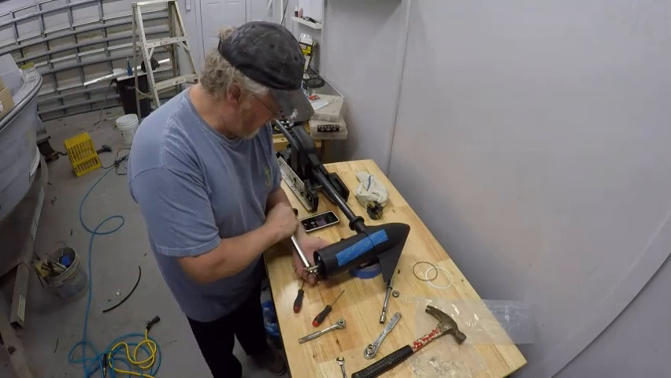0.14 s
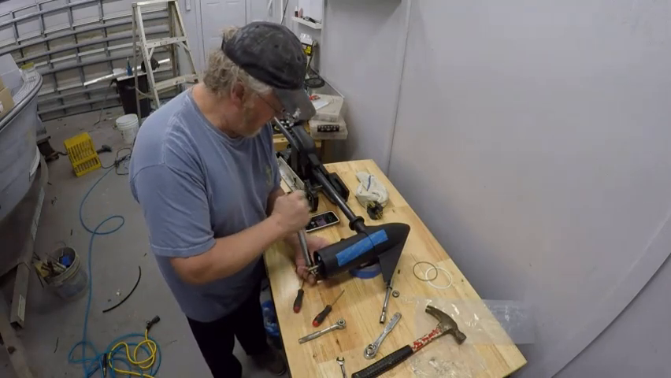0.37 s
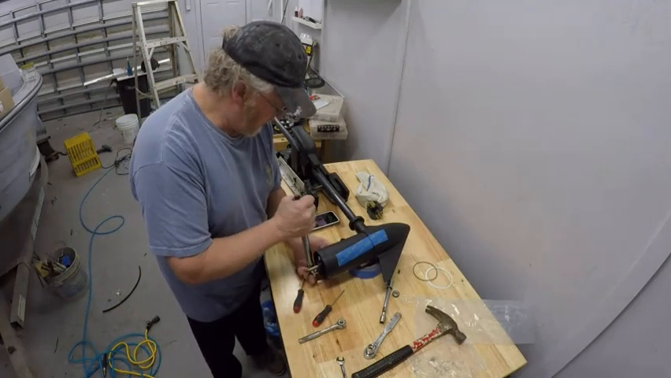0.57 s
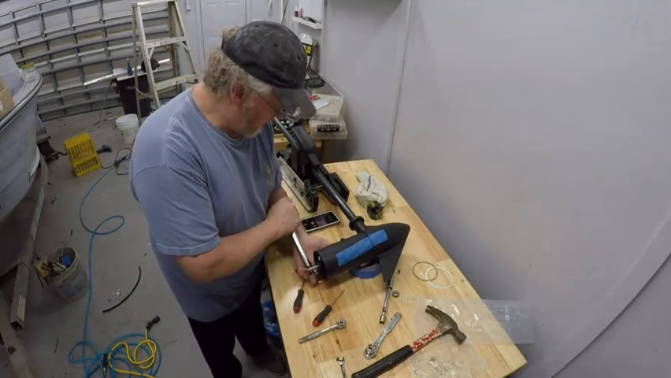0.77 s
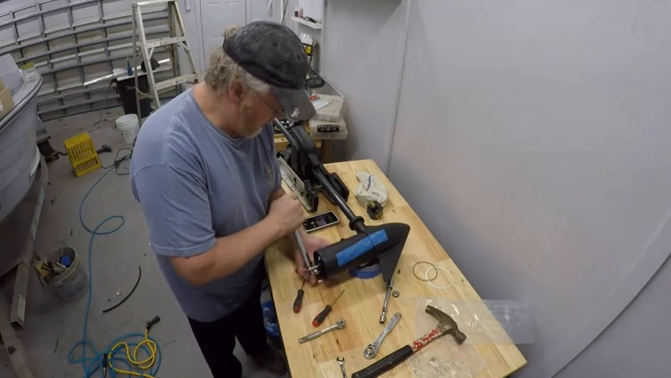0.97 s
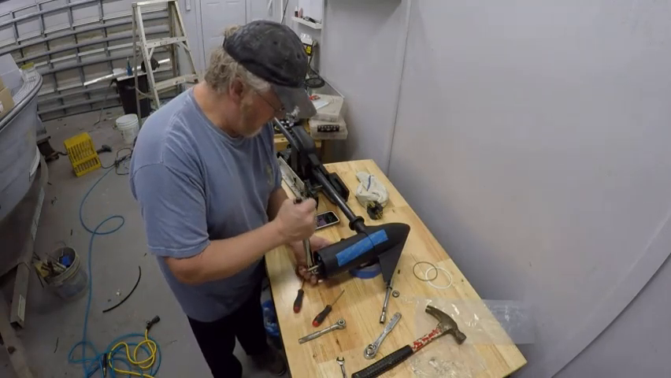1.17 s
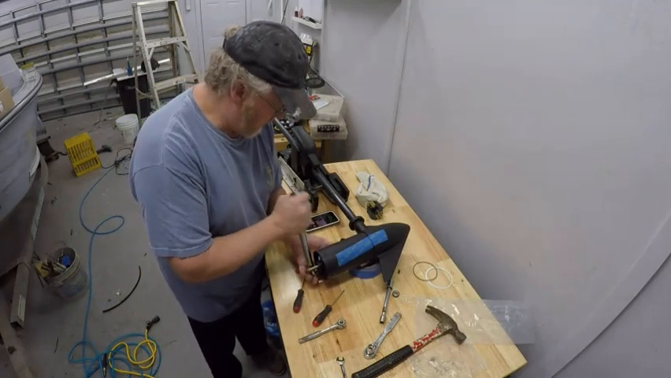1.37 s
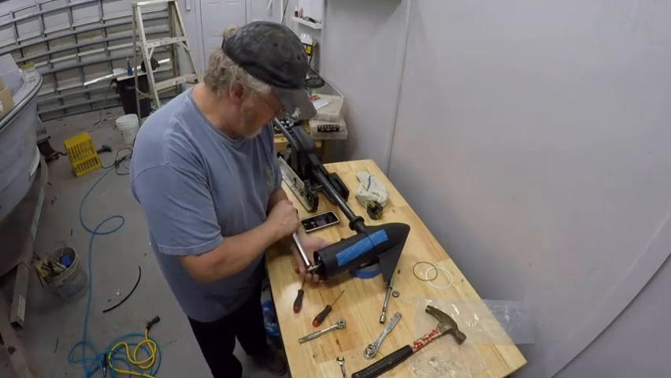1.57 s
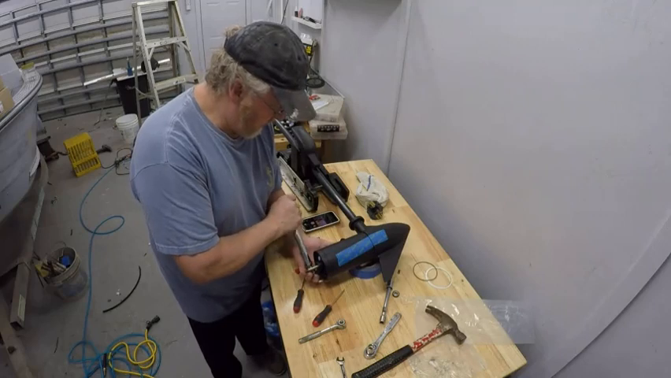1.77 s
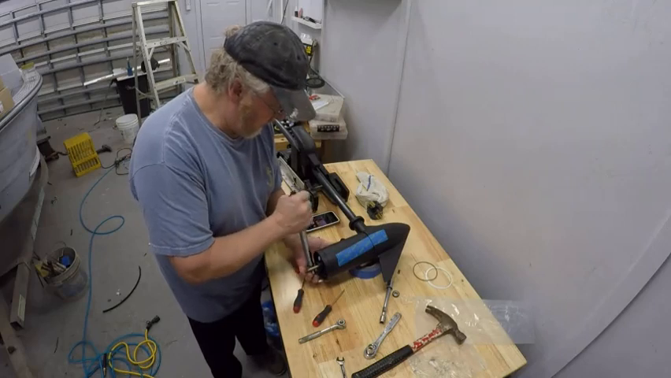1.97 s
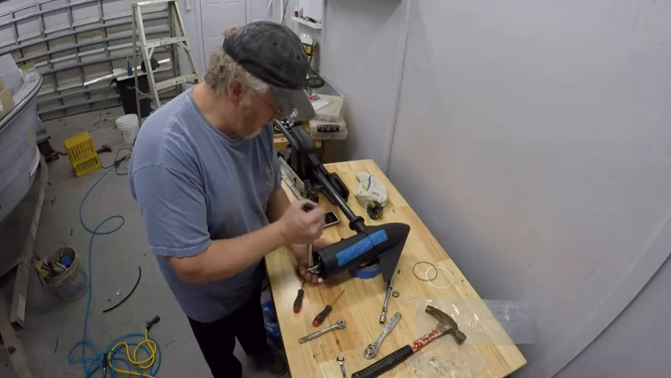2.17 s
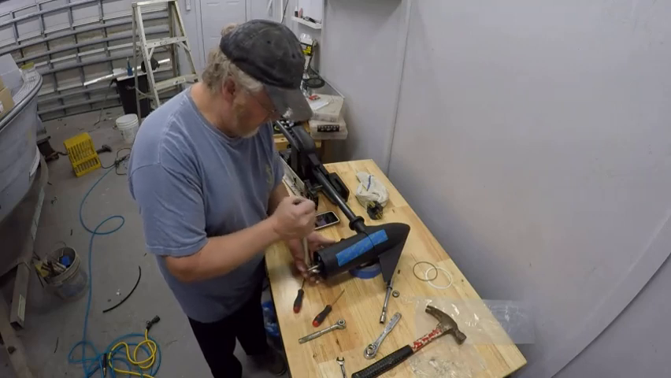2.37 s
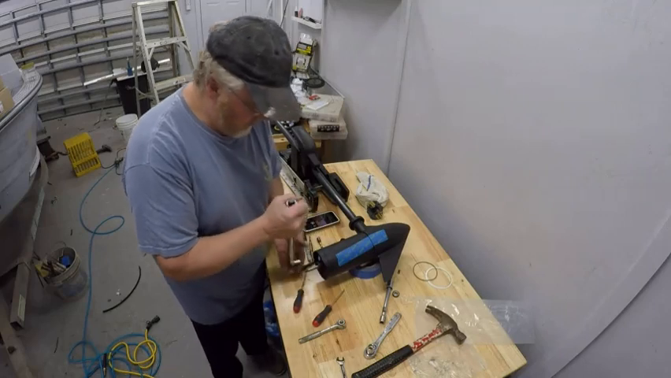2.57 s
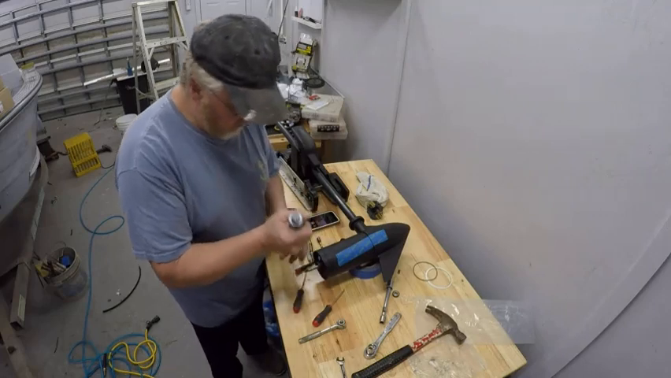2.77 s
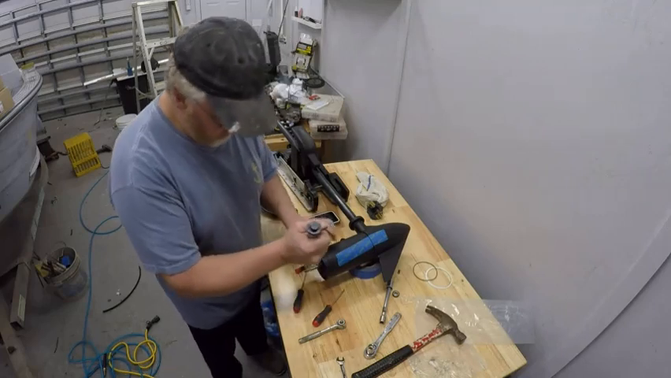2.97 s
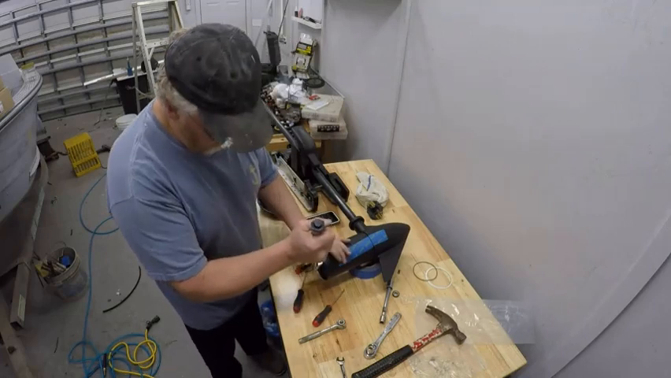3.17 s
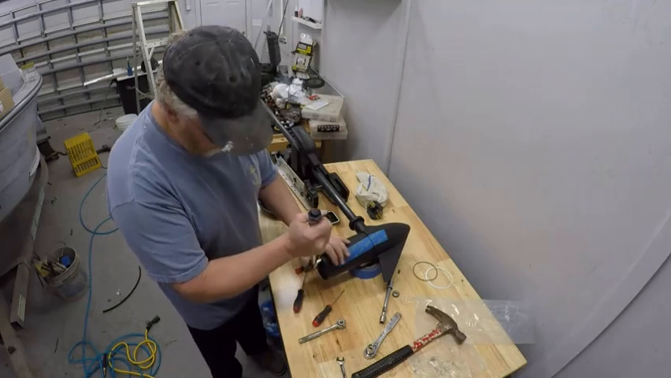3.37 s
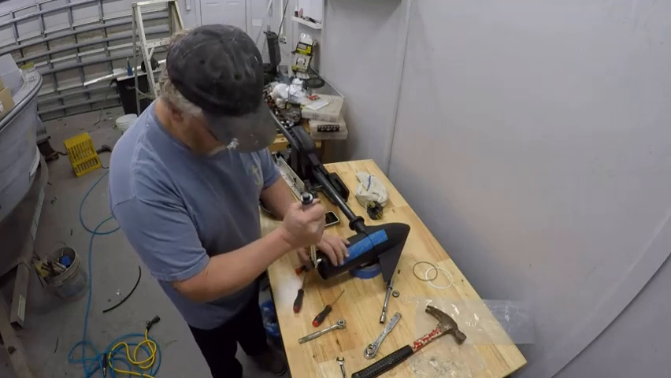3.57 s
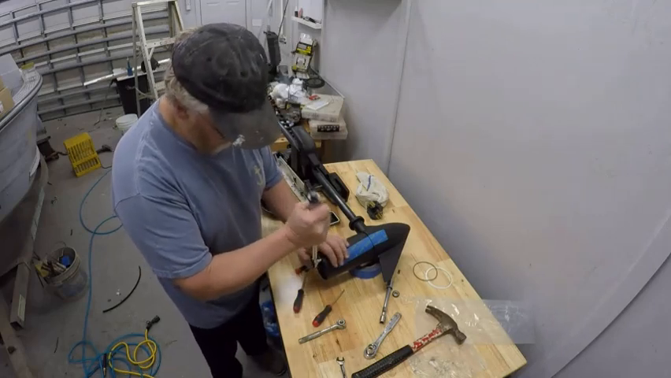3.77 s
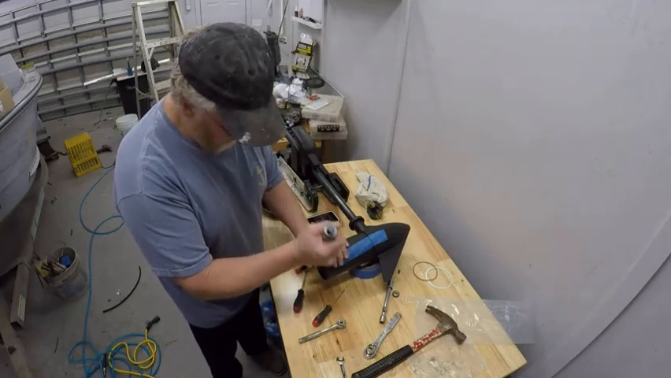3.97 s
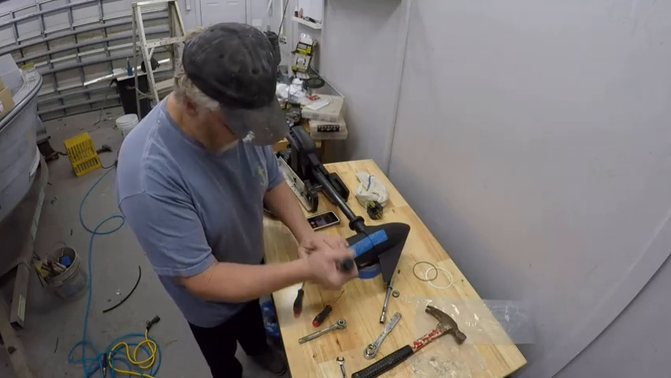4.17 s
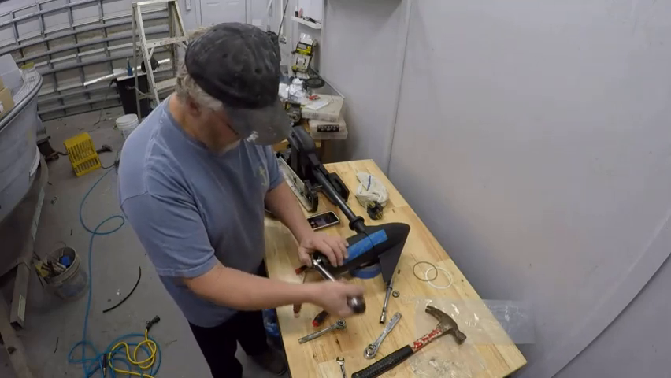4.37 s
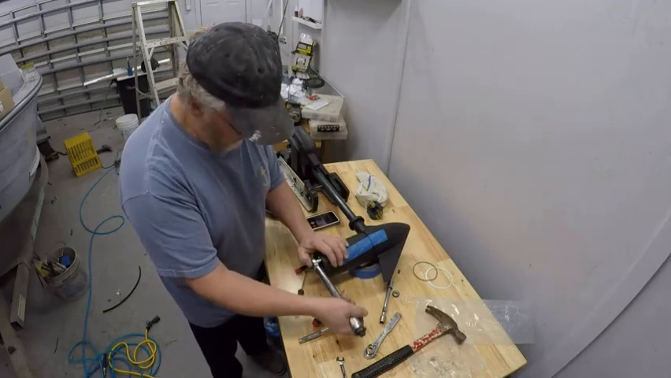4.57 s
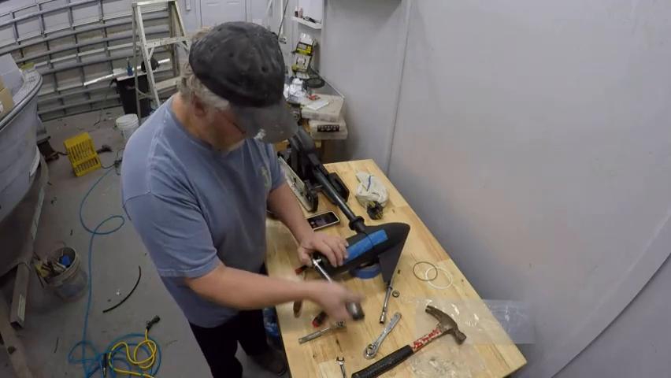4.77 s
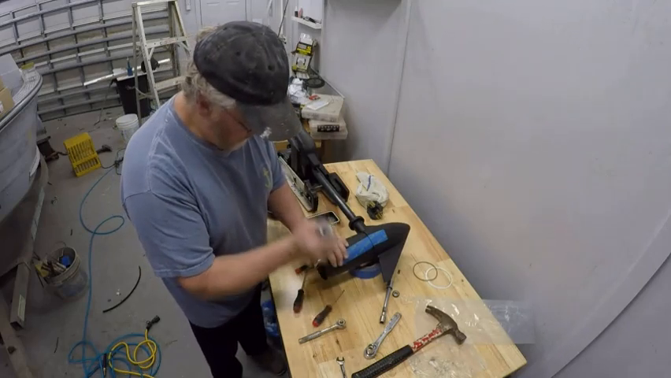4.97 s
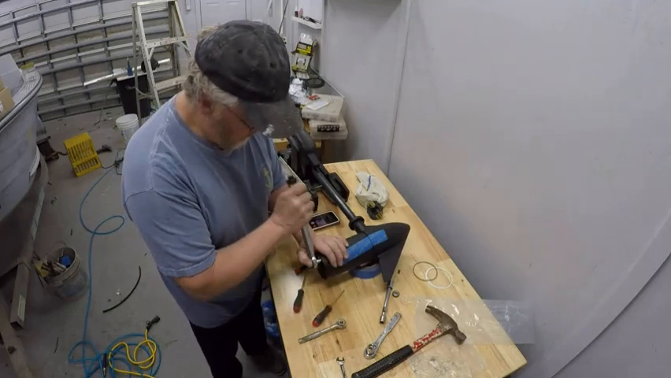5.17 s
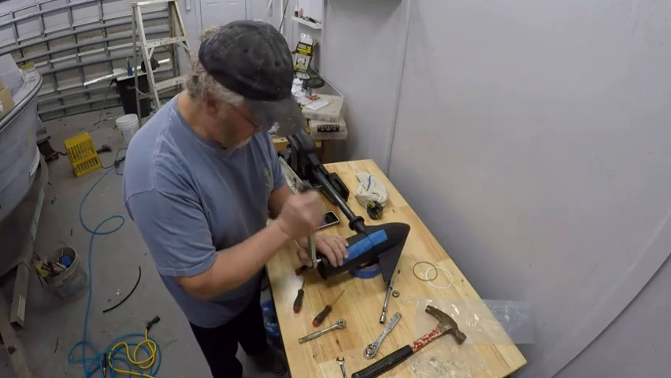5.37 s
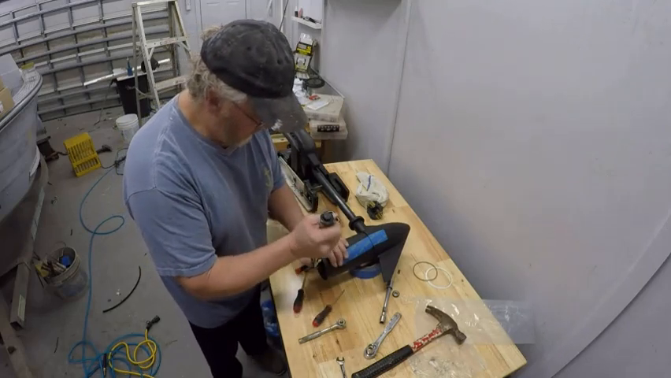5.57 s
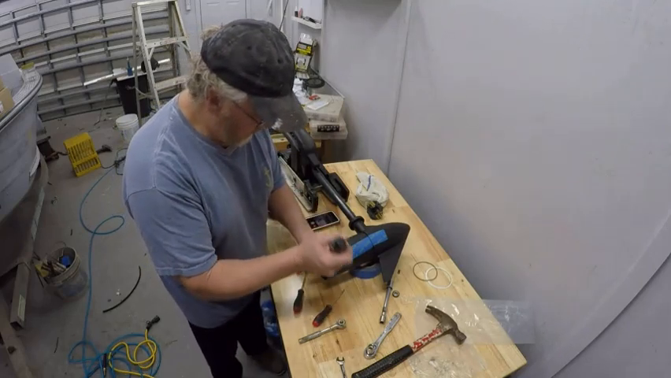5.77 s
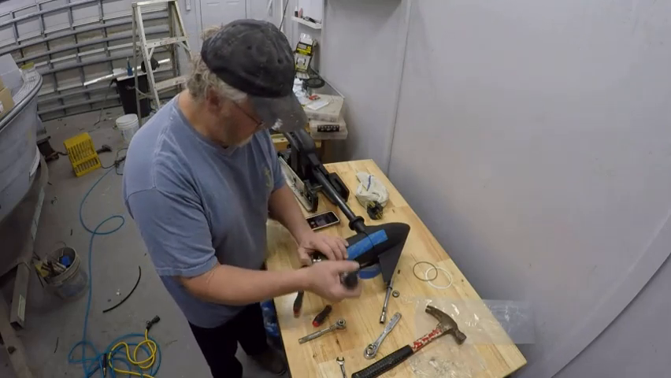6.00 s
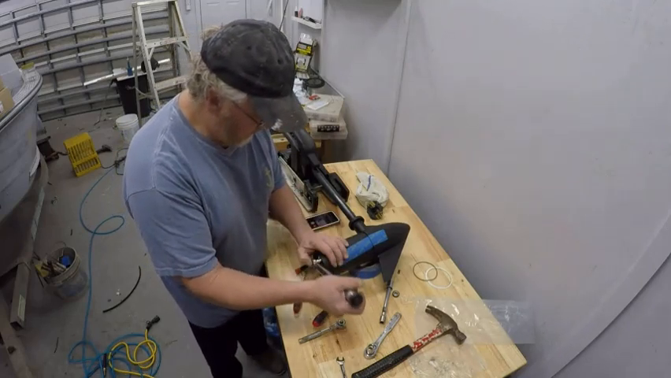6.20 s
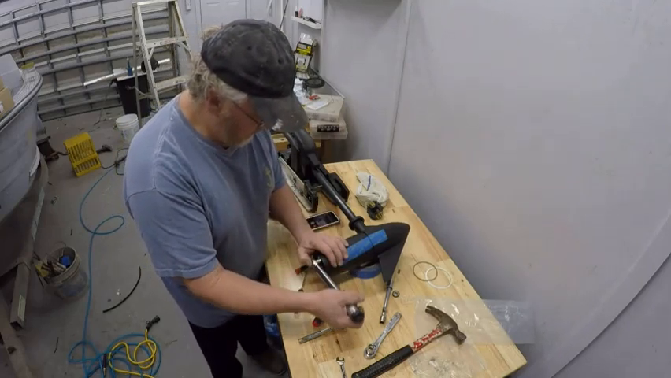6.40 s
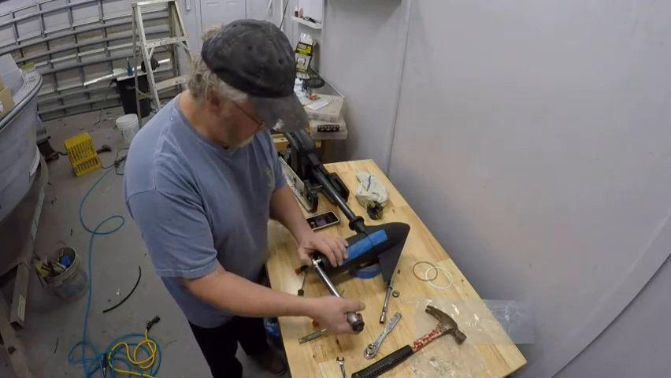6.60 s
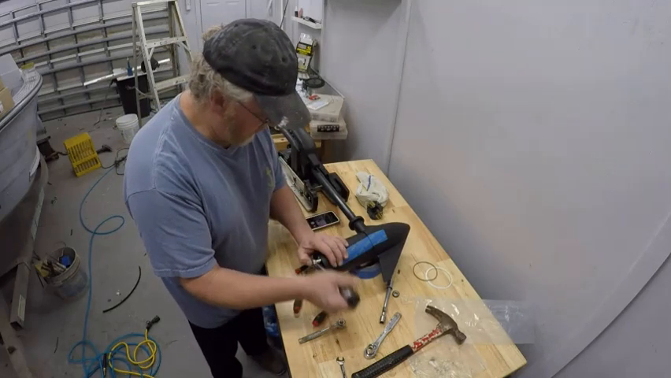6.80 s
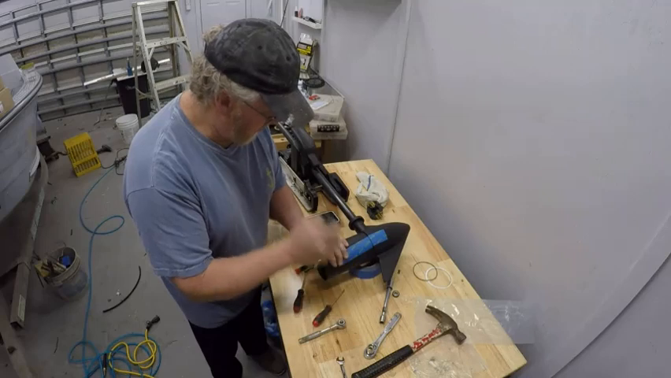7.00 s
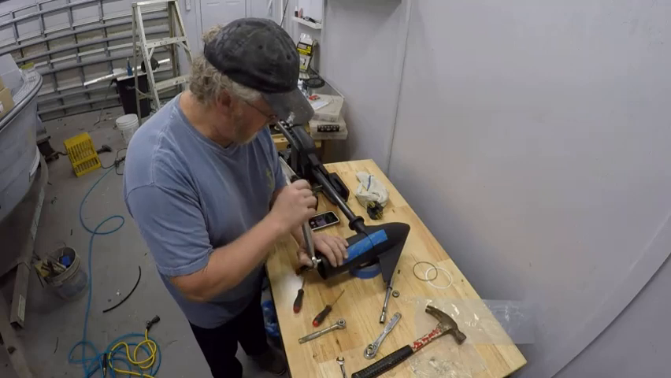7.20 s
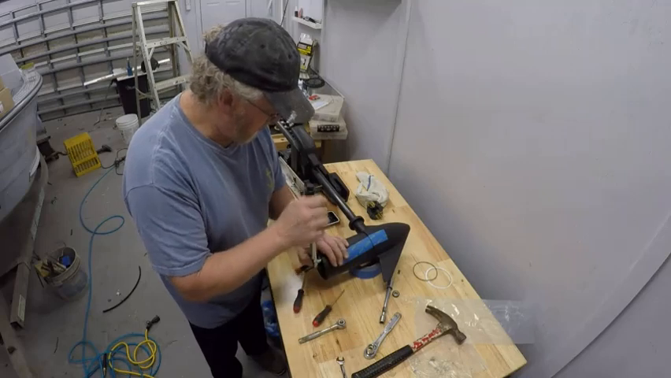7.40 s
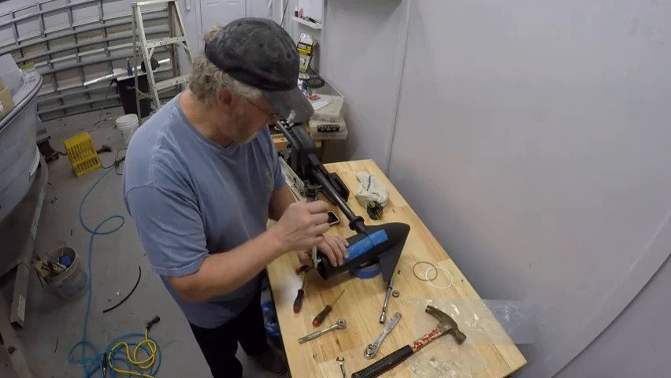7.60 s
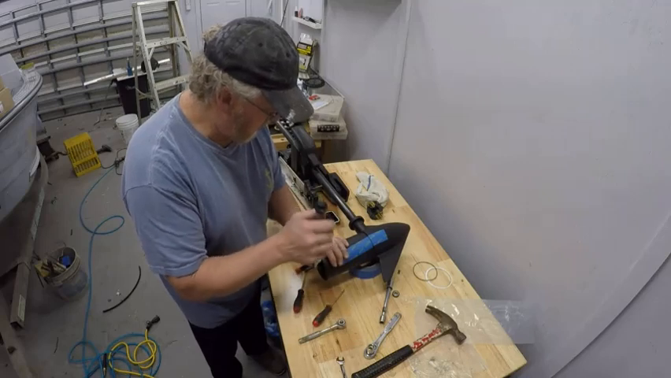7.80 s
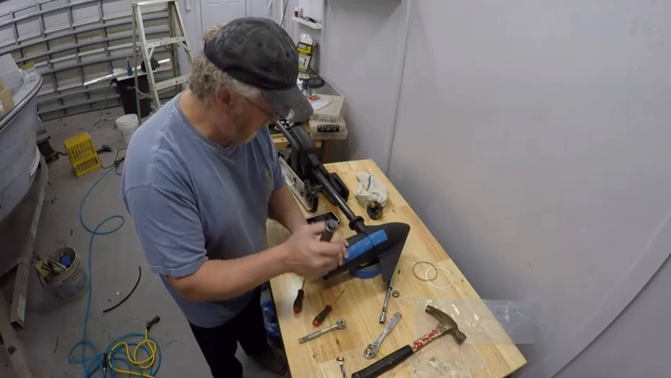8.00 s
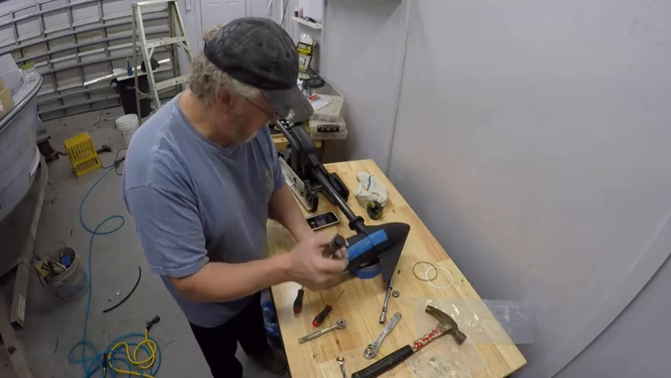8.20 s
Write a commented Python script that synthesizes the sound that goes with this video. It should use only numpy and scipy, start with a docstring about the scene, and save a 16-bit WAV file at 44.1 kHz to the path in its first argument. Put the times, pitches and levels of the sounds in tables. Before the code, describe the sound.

A ratcheting torque wrench ticks in short runs and snaps sharply while tightening bolts, with dull knocks over a low workshop rumble.

```python
"""Runs of light ticks, sharp metal snaps and dull knocks: a torque wrench tightens small bolts
on a motor housing clamped to a wooden bench. The pawl ticks on each back swing, the wrench snaps
over at the set torque, and the socket slides and knocks on the housing. Snaps and leaning thump
the bench. A hard-walled workshop with a low air rumble answers each click."""
import sys
import numpy as np
from scipy import signal
from scipy.fft import rfft, irfft
from scipy.io import wavfile
from scipy.ndimage import uniform_filter1d

SR = 44100
rng = np.random.default_rng(int(sys.argv[2]) if len(sys.argv) > 2 else 0)


def materialize(psi):
    """Save the field psi as 16-bit PCM at rate SR to the path in sys.argv[1].

    A 1-D psi becomes a single channel; in a 2-D psi each row is a channel.
    """
    bounded = np.clip(np.atleast_2d(psi).T, -1, 1)
    quanta = np.round(bounded * 32767).astype(np.int16)
    wavfile.write(sys.argv[1], SR, quanta)


N = 363825
HZ = np.fft.rfftfreq(4096, 1 / SR)
T = np.arange(SR // 3) / SR

# Levels in the tables are relative.
# air rumble spectrum: freq_hz, density_db
RUMBLE_SPECTRUM = [(10, -13), (20, -7), (29, 2), (37, -0.5), (46, -5), (56, -4), (72, -11.5), (100, -8.5),
                   (125, -13.5), (165, -24.5), (230, -25.5), (300, -31.5), (450, -39), (1000, -56)]
# hiss spectrum: freq_hz, density_db
HISS_SPECTRUM = [(200, 5.5), (600, 6), (1000, 4), (2000, 1), (4500, -1), (7000, -6), (10000, -11.5),
                 (15000, -27)]
# echoes off bench, wall and ceiling: nominal_delay_s, level_db
EARLY_ECHOES = [(.0014, 0.5), (.0055, -4.5), (.0078, -4.5), (.0092, -7.5), (.0112, -10), (0.0168, -10.5)]
# workshop decay: freq_hz, t60_s
ROOM_DECAY = [(200, 0.59), (1000, 0.36), (3500, 0.53), (6000, 0.32), (9000, 0.49), (15000, 0.22)]
# left-right difference: freq_hz, side_db
SIDE_SPECTRUM = [(3600, -69), (4800, -40), (8000, -26), (14000, -10)]
# bench with clamped motor: freq_hz, level_db, t60_s
BENCH_MODES = [(68, 6.5, 0.36), (90, -3.5, 0.3), (184.2, -5.5, 0.34), (220.7, -11, 0.41),
               (315, -19.5, 0.25), (352.5, -20, 0.17), (452, -26, 0.22)]
# steel wrench and socket: freq_hz, level_db, t60_s
STEEL_MODES = [(1195, -3, 0.093), (2610, 3, 0.099), (3070, -4.5, 0.13), (4100, -12, .12),
               (4450, -8.5, 0.14), (4770, -10, .11), (8300, 2, 0.16), (9000, -2.5, 0.13), (9460, -6, .09),
               (13380, -4, .12)]
# leaning on the work shoves the bench: start_s, level_db, hardness_db
BENCH_SHOVES = [(2.469, -49.5, -3), (5.508, -48, 1), (7.457, -40, -6.5)]
# steel slides on steel: middle_s, length_s, level_db, bright_db
STEEL_SLIDES = [(.03, 0.074, -64, -4), (2.098, .06, -66.5, -14), (2.148, 0.034, -64, -6),
                (2.813, 0.12, -64, 0), (2.884, .05, -73, -5), (3.606, 0.036, -72, 6),
                (4.807, 0.032, -69, 18)]
# socket and hand hit the housing: start_s, level_db, weight_db
HOUSING_KNOCKS = [(.41, -71, -1), (.659, -69.5, 2), (1.77, -72.5, -6), (2.4536, -59.5, -8),
                  (2.482, -65, -6), (2.658, -68.5, -15), (2.882, -68, -6), (3.2462, -66.5, 5),
                  (3.319, -75, 1), (3.924, -70.5, 1), (5.487, -67, -5), (5.5043, -62, 1), (7.453, -67, 7)]
# knock spectrum: freq_hz, level_db
KNOCK_SPECTRUM = [(100, -3), (400, -3.5), (800, -3), (1100, 1), (1500, -6.5), (3000, -3.5), (4500, -10.5),
                  (7000, -22.5), (12000, -32.5)]
# pawl drops into a tooth: start_s, level_db, bright_db, head_hz
PAWL_TICKS = [(.098, -52.5, -1, 5000), (.158, -54.5, 4, 4770), (.799, -49, -4.5, 4800),
              (.868, -56.5, 3.5, 4140), (.889, -57.5, -4, 4310), (1.534, -50, 0.5, 4670),
              (1.5981, -52, -0.5, 5900), (4.934, -52, -2.5, 5030), (4.99, -52, 2, 5200),
              (5.047, -55, 0.5, 5200), (5.097, -51, -1.5, 5300), (5.1525, -52, 0, 5130),
              (5.2114, -53, -3.5, 5300), (5.313, -58, 3, 5470), (6.9752, -49.5, -2, 5170),
              (7.041, -56, 2.5, 4460), (7.102, -50.5, -1.5, 5960), (7.161, -51.5, 0, 5250),
              (7.222, -51, 1, 5530), (7.3096, -56, 6, 5400)]
# tick spectrum: freq_hz, level_db
TICK_SPECTRUM = [(300, -15), (1400, -17), (2400, -9), (3200, -10.5), (4000, -5), (5400, -1.5), (6500, -5.5),
                 (7600, -11), (8850, -6.5), (10000, -13), (12000, -15.5), (14300, -12), (15500, -16.5)]
# wrench breaks over, springs back: start_s, level_db, body_db, bright_db, top_db, housing_hz, handle_hz
WRENCH_SNAPS = [(1.3976, -44.5, -3.5, 2, 0, 1830, 4050), (2.157, -44, -7.5, 8, -2, 1850, 5200),
                (2.208, -44, 3.5, 0, -6, 1110, 4050), (3.542, -50, -3, 4.5, -5, 776, 3870),
                (3.56, -50, 4.5, 4, -7, 710, 2490), (3.6177, -45, -1.5, -3.5, 4, 1930, 3080)]
# snap spectrum: freq_hz, level_db
SNAP_SPECTRUM = [(350, 2), (600, -5.5), (1100, -4), (1500, -5.5), (2000, -3.5), (2800, -0.5), (4200, 1),
                 (5800, -6), (6800, -6.5), (7700, -13.5), (8900, -7.5), (10500, -17.5), (12000, -20.5),
                 (13400, -11.5), (15000, -34)]


def amp(db):
    return 10 ** (np.asarray(db) / 20)


def unit(x):
    """Scale to unit energy."""
    return x / np.sqrt(np.sum(x ** 2) + 1e-20)


def curve(points, hz):
    """Interpolate (freq_hz, value) points over log frequency."""
    freq_hz, value = np.transpose(points)
    return np.interp(np.log(hz + 1), np.log(freq_hz), value)


def add(mix, start_s, sound):
    part = mix[round(start_s * SR):][:len(sound)]
    part += sound[:len(part)]


def min_phase(gain):
    """Minimum-phase impulse response for a gain over HZ."""
    log_gain = np.log(np.maximum(gain, 1e-6))
    mirrored = np.concatenate([log_gain, log_gain[-2:0:-1]])
    return irfft(np.exp(np.conj(signal.hilbert(mirrored)))[:len(HZ)])


def shaped(x, points):
    """Filter a track by (freq_hz, gain_db) points."""
    return irfft(rfft(x) * amp(curve(points, np.fft.rfftfreq(N, 1 / SR))), N)


def resonance(centre_hz, peak_db, half_width_hz):
    """Bell-shaped boost in dB over HZ."""
    return peak_db / (1 + ((HZ - centre_hz) / half_width_hz) ** 2)


def ring(modes, gains):
    """Sum of decaying modes, one gain each."""
    hz, db, t60_s = np.transpose(modes)[:, :, None]
    return (gains[:, None] * amp(db - 60 * T / t60_s) * np.sin(2 * np.pi * hz * T)).sum(0)


def chatter(decay_s, flatness=0.88):
    """Dense burst with a near-flat spectrum, as of metal parts rattling."""
    fade = np.exp(-T[:len(HZ)] / decay_s)
    burst = rng.standard_normal(len(fade)) * fade
    for _ in range(2):
        spectrum = rfft(burst)
        burst = irfft(spectrum / (abs(spectrum) + 1e-12) ** flatness, len(fade)) * np.sqrt(fade)
    return unit(burst)


def air(rumble_db=-45, hiss_db=-66, swell_db=0.5, max_swell_hz=1.24, fade_db_per_s=0.33):
    """Moving air: a rumble that swells at random and eases off, plus steady hiss."""
    rumble, hiss = rng.standard_normal((2, N))
    t = np.arange(N) / SR
    drift = sum(np.sin(2 * np.pi * (max_swell_hz * rate * t + phase))
                for rate, phase in rng.random(size=(12, 2)))
    swell = amp(swell_db * drift / drift.std() - fade_db_per_s * t)
    rumble = amp(rumble_db) * unit(swell * shaped(rumble, RUMBLE_SPECTRUM))
    hiss = amp(hiss_db) * unit(shaped(hiss, HISS_SPECTRUM))
    return np.sqrt(N) * (rumble + hiss)


def workshop(x, echo_db, scatter_s=0.0079, wander=0.15):
    """Direct sound, diffuse tail, scatter off nearby tools, and echoes that shift as the arm moves."""
    hz, t, spectra = signal.stft(rng.standard_normal(len(T)), SR, nperseg=256)
    decay = amp(-60 * t / curve(ROOM_DECAY, hz)[:, None])
    tail = signal.istft(spectra * decay, SR, nperseg=256)[1][:len(T)]
    scatter = rng.standard_normal(len(T)) * np.exp(-T / scatter_s)
    build_up = np.clip((T - 0.003) / 0.0054, 0, 1)
    response = amp(0.4 * echo_db - 3) * unit(tail * build_up)
    response += amp(echo_db - 8) * unit(scatter * build_up)
    response[0] += 1
    for nominal_s, db in EARLY_ECHOES:
        delay_s = nominal_s * (1 + wander * rng.uniform(-1.1, 1))
        add(response, delay_s, amp(db + echo_db) * chatter(decay_s=0.0008))  # smeared by clutter
    return signal.fftconvolve(x, response)[:len(T)]


def bench(recoil_lag_s=0.0029, usual_snap_db=-46, attack_s=0.0035):
    """Snaps and shoves ring the low bench modes; a harder push reaches the higher ones."""
    out = np.zeros(N)
    recoils = [(start_s + recoil_lag_s, -49, 3 + 0.77 * (db + body_db - usual_snap_db))
               for start_s, db, body_db, *_ in WRENCH_SNAPS]
    attack = 1 - np.exp(-T / attack_s)
    for start_s, db, hardness_db in recoils + BENCH_SHOVES:
        push = amp(curve([(80, 0), (200, hardness_db)], np.transpose(BENCH_MODES)[0]))
        add(out, start_s, amp(db + 4) * ring(BENCH_MODES, push) * attack)
    return out


def slides(grain_spread_db=4):
    """Swells of friction grains as the wrench takes load or lifts."""
    out = np.zeros(N)
    for middle_s, length_s, db, bright_db in STEEL_SLIDES:
        n = round(length_s * SR)
        noise, sizes = rng.standard_normal((2, len(T)))[:, :n]
        grains = noise * amp(grain_spread_db * sizes) * np.hanning(n)
        colour_db = curve([(700, 1), (2000, -5), (3200, 1), (4600, -3),
                           (7000, bright_db - 10), (14000, bright_db - 17)], HZ)
        rub = signal.fftconvolve(grains, min_phase(amp(colour_db)))
        add(out, max(middle_s - length_s / 2, 0), amp(db) * np.sqrt(n / 2) * unit(rub))
    return out


def contact(colour_db, shade_db, decay_s, ring_db, echo_db=0):
    """One blow: chatter, coloured by the parts that meet, rings the steel and the room."""
    ripple = uniform_filter1d(uniform_filter1d(rng.standard_normal(len(HZ)), size=24), size=24)
    colour_db = colour_db + 2 * np.sqrt(HZ / 5000) * ripple / ripple.std()  # grip damps highs unevenly
    gain = amp(colour_db + shade_db) / np.sqrt(np.mean(amp(2 * colour_db)))
    mode_gains = np.interp(np.transpose(STEEL_MODES)[0], HZ, gain)
    mode_gains *= amp(2 * rng.standard_normal(len(STEEL_MODES)))
    response = amp(ring_db) * ring(STEEL_MODES, mode_gains)
    add(response, 0, min_phase(gain))
    blow = signal.fftconvolve(chatter(decay_s), response)[:len(T)]
    return workshop(blow, echo_db)


def knocks(gain_db=29, dulling=0.52):
    """Socket and hand knock on the housing; heavier is deeper and duller."""
    out = np.zeros(N)
    for start_s, db, weight_db in HOUSING_KNOCKS:
        shade_db = curve([(1100, weight_db), (1900, 0), (3500, 0), (5500, -dulling * weight_db)], HZ)
        knock = contact(curve(KNOCK_SPECTRUM, HZ), shade_db, decay_s=0.0051, ring_db=-52.5)
        add(out, start_s, amp(db + gain_db) * knock)
    return out


def ratchet(gain_db=24.5, slip_db=-13, max_lead_s=0.002):
    """The pawl slips over a crest, then lands; head resonances shift with tooth and grip."""
    out = np.zeros(N)
    shifts_hz = rng.uniform(-0.75, 1, (len(PAWL_TICKS), 2)) * (500, 250)
    for (start_s, db, bright_db, head_hz), (low_shift_hz, high_shift_hz) in zip(PAWL_TICKS, shifts_hz):
        colour_db = curve(TICK_SPECTRUM, HZ) + resonance(head_hz, peak_db=7, half_width_hz=360)
        colour_db += resonance(3180 + low_shift_hz, peak_db=5, half_width_hz=230)
        colour_db += resonance(8850 + high_shift_hz, peak_db=5, half_width_hz=230)
        shade_db = curve([(2900, 2.04), (4300, 0), (6400, 0), (8200, bright_db)], HZ)
        tick = amp(db + gain_db) * contact(colour_db, shade_db, decay_s=0.0014, ring_db=-53, echo_db=0.4)
        add(out, start_s, tick)
        add(out, start_s - max_lead_s * rng.uniform(0.55, 1), amp(slip_db) * tick)
    return out


def snaps(gain_db=25, trip_db=-14, lead_s=0.00111):
    """The loaded release trips, then strikes inside the handle tube; the housing answers."""
    out = np.zeros(N)
    for start_s, db, body_db, bright_db, top_db, housing_hz, handle_hz in WRENCH_SNAPS:
        colour_db = curve(SNAP_SPECTRUM, HZ) + resonance(housing_hz, peak_db=5, half_width_hz=130)
        colour_db += resonance(handle_hz, peak_db=4, half_width_hz=400)
        shade_db = curve([(1300, body_db), (2500, 0), (5500, 0),
                          (8000, bright_db), (10000, bright_db), (13000, top_db)], HZ)
        snap = amp(db + gain_db) * contact(colour_db, shade_db, decay_s=0.0022, ring_db=-50.5)
        add(out, start_s, snap)
        add(out, start_s - lead_s, amp(trip_db) * snap)
    return out


def scene():
    """Wrench, bench and air in stereo; left and right differ only in the treble."""
    wrench = ratchet() + snaps() + knocks() + slides()
    background = air()
    mid = wrench + bench() + background
    diffuse = signal.fftconvolve(wrench + amp(-4) * background, chatter(decay_s=0.0033))[:N]
    side = shaped(diffuse, SIDE_SPECTRUM)
    return np.array([mid + side, mid - side])


def record(dry):
    """Steep low-pass."""
    cutoff_hz = 15600
    lowpass = signal.firwin(401, cutoff_hz, window=("kaiser", 8), fs=SR)
    return signal.oaconvolve(dry, lowpass[None], "same")


dry = scene()
out = record(dry)
materialize(out)
```